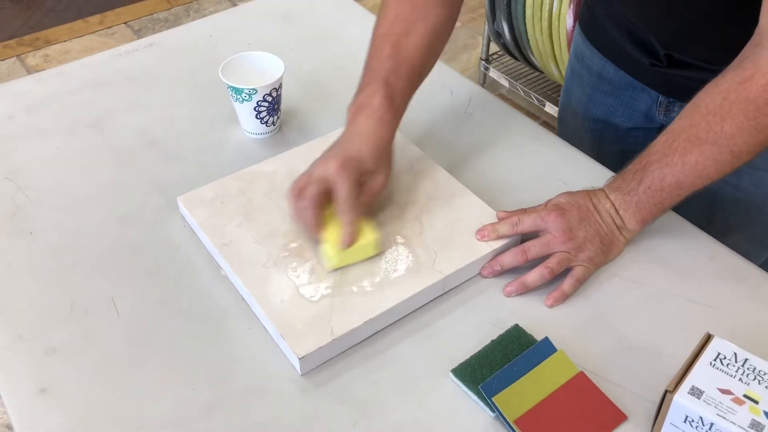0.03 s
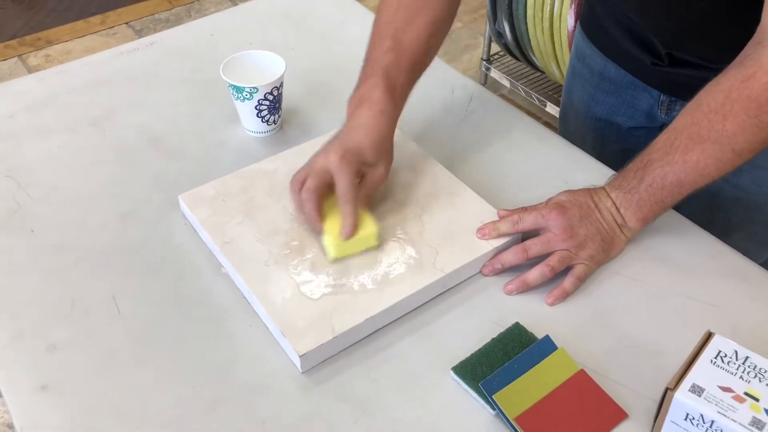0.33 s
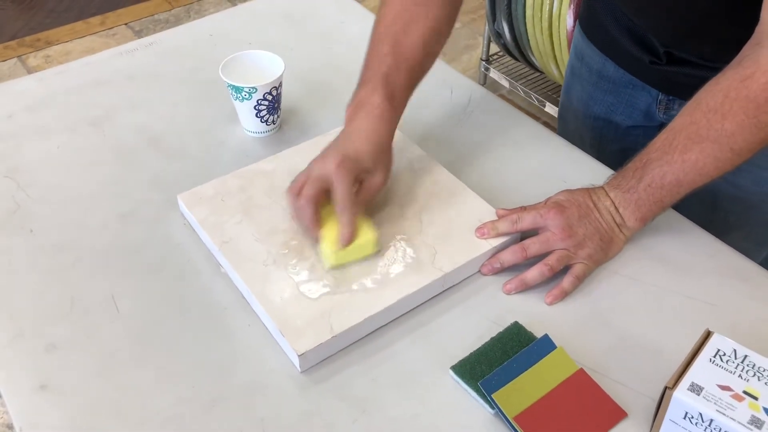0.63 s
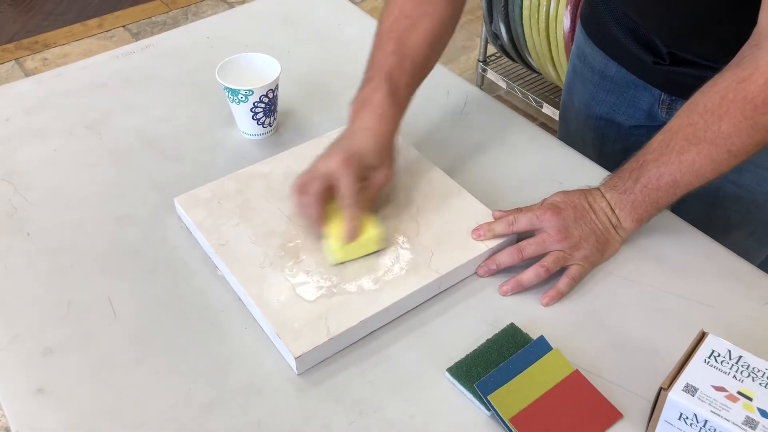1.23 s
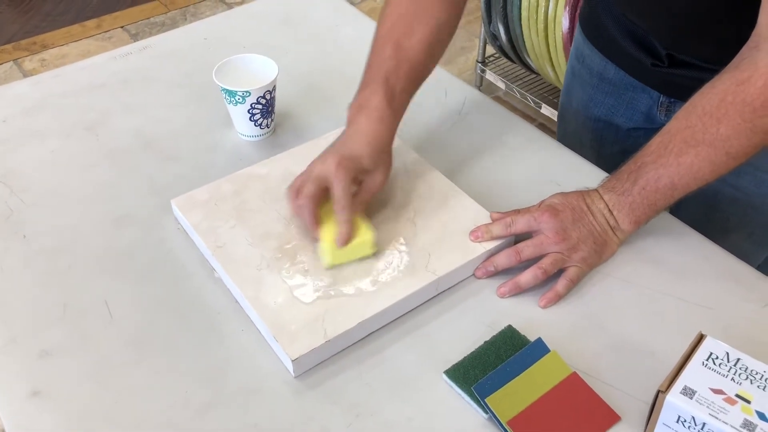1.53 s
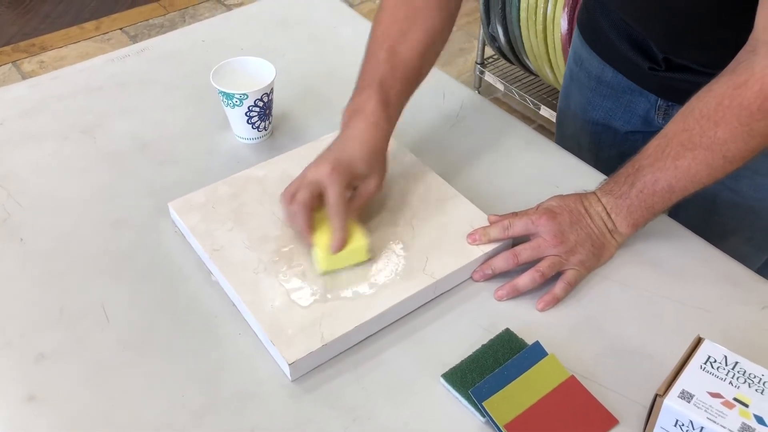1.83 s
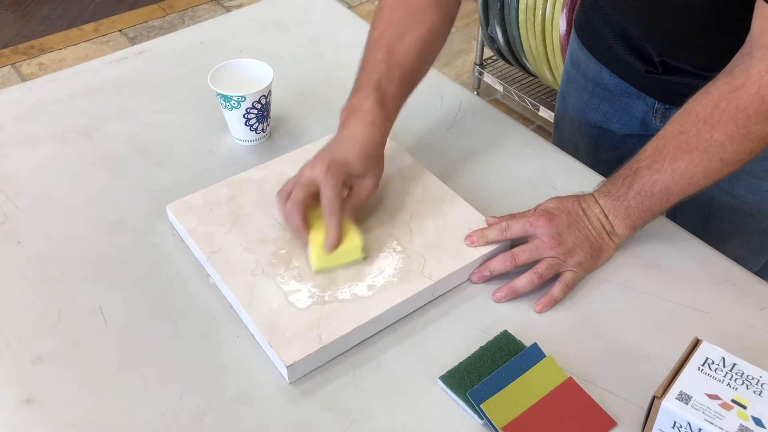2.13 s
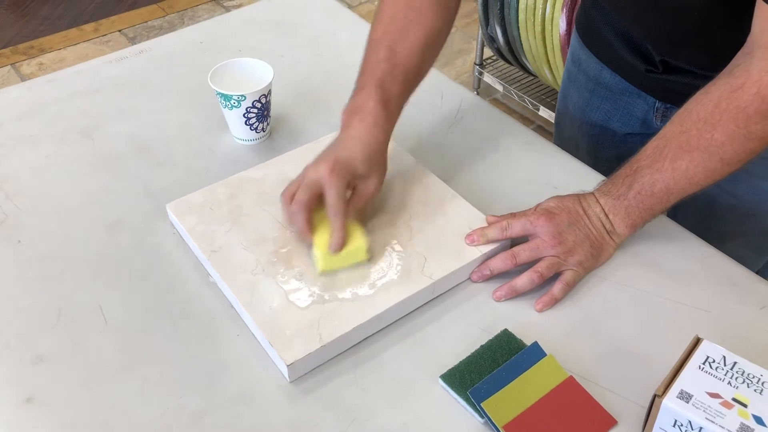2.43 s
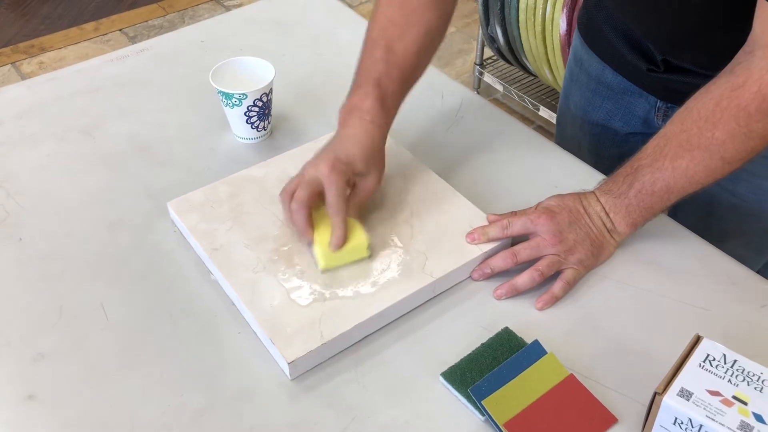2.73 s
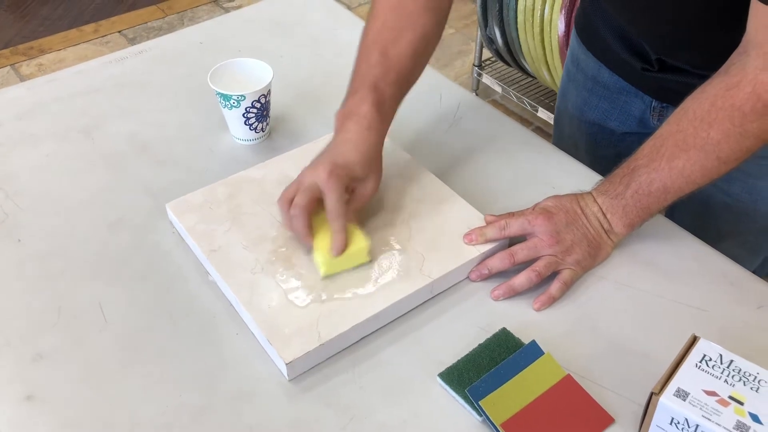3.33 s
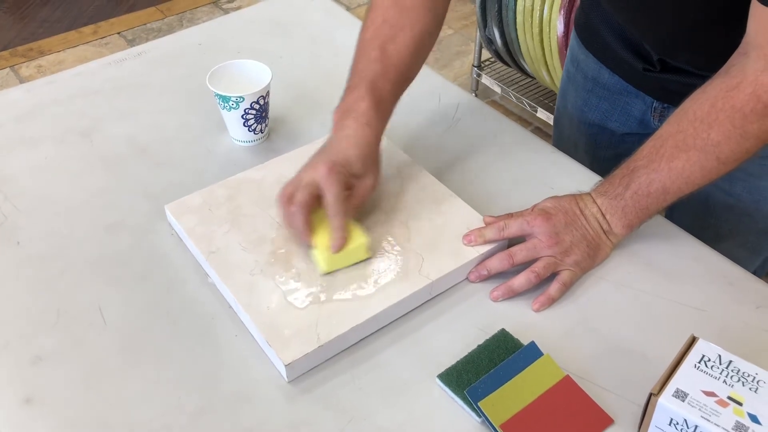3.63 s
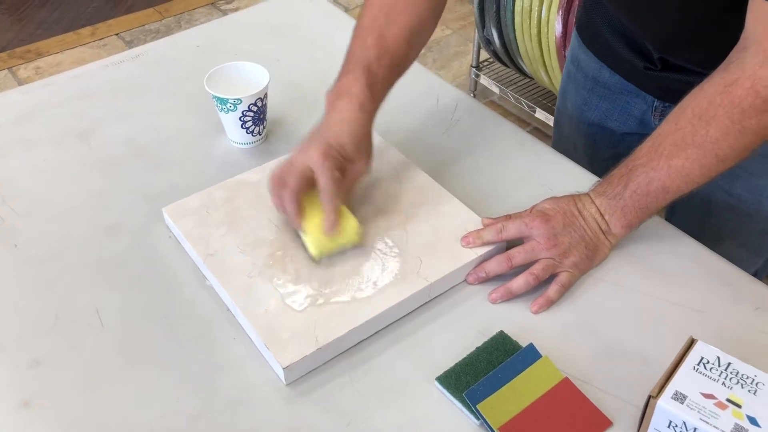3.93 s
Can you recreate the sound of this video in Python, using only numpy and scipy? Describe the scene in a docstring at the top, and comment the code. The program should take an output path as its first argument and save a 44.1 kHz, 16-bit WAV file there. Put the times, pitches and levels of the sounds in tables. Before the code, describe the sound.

Gritty, wet scrubbing of an abrasive pad circling steadily on a stone slab.

```python
"""Wet pad scrubbing stone

A wet abrasive pad circles on a stone slab on a table, about three small loops a second.
Grit catches the stone in a dense hiss; hollows under hand and pad colour each part of the loop.
Squeezed water squelches, the table rumbles under the strokes and a motor hums in the workshop."""
import sys
import numpy as np
from scipy import signal
from scipy.fft import rfft, irfft
from scipy.io import wavfile

SR = 44100
rng = np.random.default_rng(int(sys.argv[2]) if len(sys.argv) > 2 else 0)


def master_out(mix):
    """Clip the mix to full scale and print it as 16-bit PCM to the path in sys.argv[1]."""
    frames = np.transpose(np.atleast_2d(mix))
    ceiling = np.clip(frames, -1, 1)
    pcm = np.round(ceiling * 32767).astype(np.int16)
    wavfile.write(sys.argv[1], SR, pcm)


N = 176400
T = np.arange(N) / SR

# Hand loops (mid-push time [s], far-turn time [s], push strength [x], push pitch [Hz], hollow depth [x])
LOOPS = [(-.05, 0.03, 1, 4900, 1), (0.23, 0.325, 0.96, 5900, 1), (0.527, 0.618, 1, 5930, 0.84),
         (0.856, 0.94, 1.2, 5400, 1), (1.164, 1.25, 1, 5870, 1), (1.45, 1.525, 0.9, 5750, 1.06),
         (1.745, 1.83, 0.9, 5800, 0.65), (2.035, 2.13, .8, 5700, 1), (2.326, 2.417, 0.8, 5700, 0.9),
         (2.625, 2.705, .9, 5600, 1), (2.934, 3, 1, 5570, 1), (3.238, 3.32, 1.3, 5700, 1.06),
         (3.54, 3.637, 1.1, 5900, .9), (3.875, 3.94, .2, 5700, 0.75), (4.15, 4.23, 1, 5700, 0.6)]
# Grit spectrum (frequency [Hz], density [dB])
GRIT_SPECTRUM = [(300, -17), (750, -22), (930, -14.5), (1060, -12), (1280, -2.5), (1450, -10), (1650, -4),
                 (1900, -11.5), (2500, -4), (3000, -4.5), (3500, 0.5), (4100, -2.5), (4500, -9.5),
                 (4950, -4.5), (6000, -4.5), (6800, -1.5), (7500, -3), (8100, -7), (8900, -6), (10000, -8),
                 (11200, -8), (13000, -11), (15700, -15)]
# Scrubbing effort, used relative to its median (time [s], level [dB])
EFFORT = [(0.0, -36.5), (0.05, -42), (0.09, -38.5), (0.18, -41.5), (0.24, -36.5), (0.3, -40), (0.35, -39.5),
          (0.42, -40.5), (0.45, -39.5), (0.51, -41.0), (0.57, -36.5), (0.61, -40.5), (0.64, -47),
          (0.66, -41.5), (0.7, -39), (0.8, -43.5), (0.83, -38.5), (0.87, -37.5), (0.95, -44.5),
          (0.98, -39.5), (1.1, -42.0), (1.12, -43), (1.17, -37), (1.26, -42.0), (1.32, -39.5), (1.35, -41),
          (1.41, -41.0), (1.44, -38.5), (1.5, -38), (1.55, -41.0), (1.67, -41.5), (1.7, -43.5),
          (1.74, -38.5), (1.77, -38.0), (1.83, -43), (1.86, -39.5), (1.99, -42.0), (2.01, -39.5),
          (2.07, -37.5), (2.11, -41.5), (2.16, -38.0), (2.19, -41.5), (2.4, -37.5), (2.44, -42),
          (2.51, -40), (2.58, -42.0), (2.62, -38.5), (2.69, -41), (2.76, -39.5), (2.82, -42), (2.86, -40.5),
          (2.93, -40.5), (3.0, -39.0), (3.07, -43.5), (3.09, -40.5), (3.19, -41.5), (3.25, -37.5),
          (3.32, -42), (3.39, -39.0), (3.46, -46), (3.52, -38.5), (3.6, -42), (3.71, -42.0), (3.83, -42.5),
          (3.86, -40.5), (3.92, -43), (3.98, -49), (3.99, -65)]
# Hiss response to effort (frequency [Hz], slope [dB/dB])
EFFORT_SLOPE = [(500, 0.08), (1300, 0.054), (2500, 0.54), (3500, 0.65), (5500, 1.08), (9000, 1.36),
                (16000, 0.87)]
# Low-mid weight, used relative to its median (time [s], level [dB])
LOW_MID_LEVEL = [(0.0, -51), (0.24, -56), (0.33, -53), (0.49, -54.5), (0.6, -52), (0.85, -56),
                 (0.93, -52.5), (1.46, -51.5), (1.51, -50.5), (1.75, -52), (1.77, -50.5), (2.04, -51),
                 (2.12, -48.5), (2.15, -51.5), (3.16, -51), (3.24, -53.5), (3.32, -50), (3.35, -53.5),
                 (3.45, -48.5), (3.51, -54), (3.74, -49.5), (3.89, -57), (3.91, -56), (4.0, -61.5)]
# Hollows (centre [Hz], width [oct], gain [dB], place [loops], length [loops], glide [oct/loop])
HOLLOWS = [(1875, 0.17, 7, 0.18, 0.098, -0.022), (2730, .13, 3.5, 0.14, 0.056, -0.21),
           (3330, 0.027, 6, 0.63, 0.061, -0.48), (4240, 0.036, 8.5, 0.74, 0.057, 0.086),
           (1220, 0.11, 4, 0.69, 0.096, -0.93), (684, 0.23, 10, 0.56, 0.12, -0.64),
           (980, 0.059, 7.5, 0.78, 0.073, 0.08), (1260, 0.057, -10.5, 0.92, 0.068, 0.42),
           (3470, 0.19, -4, 1, 0.089, 0.06), (7000, 0.15, -4, 0.08, 0.065, 0)]
# Rasp of the forward push (width [oct], gain [dB], place [loops], length [loops], glide [oct/loop])
PUSH_RASP = (0.12, 4.65, 0.014, 0.15, 0.15)


def scrub(grains_per_s=11000, smooth_share=0.45, far_turn_loops=0.18):
    """Grit catches the stone; effort, hollows and water shape the hiss."""
    clicks = np.sqrt(1 - smooth_share) * grains(grains_per_s, spread_db=2)
    hiss = np.sqrt(smooth_share) * rng.standard_normal(N)
    hz, t, spectrum = signal.stft(clicks + hiss, SR, nperseg=512, noverlap=384)
    hz = hz[:, None]
    push_s, far_s, *per_loop = np.transpose(LOOPS)
    loop = np.arange(len(push_s))
    turn = np.interp(t, np.c_[push_s, far_s].ravel(), np.c_[loop, loop + far_turn_loops].ravel())
    push, push_hz, depth = (np.interp(t, push_s, column) for column in per_loop)
    effort_db, low_mid_db = at_time(EFFORT, t), at_time(LOW_MID_LEVEL, t)
    db = at_hz(GRIT_SPECTRUM, hz) + at_hz(EFFORT_SLOPE, hz) * (effort_db - np.median(effort_db))
    db += depth * sum(resonance(hz, turn, *row) for row in HOLLOWS)
    db += push * resonance(hz, turn, push_hz, *PUSH_RASP)
    low_mid_band = bell(np.log2((hz + 1) / 1220) / 0.85)
    db += 0.9 * (low_mid_db - np.median(low_mid_db)) * low_mid_band
    db += squelches(hz, t)
    db += flicker(hz, t)
    _, shaped = signal.istft(spectrum * amp(db), SR, nperseg=512, noverlap=384)
    return unit(shaped[:N])


def grains(per_s, spread_db):
    """Grit clicks of either sign, a few larger than the rest."""
    size = amp(spread_db * np.minimum(rng.exponential(1, N), 3.5))
    return unit(size * rng.choice([-1., 1.], N) * (rng.random(N) < per_s / SR))


def resonance(hz, turn, centre_hz, width_oct, gain_db, place, length, glide):
    """Gain in dB of a peak or notch that opens, glides and closes once a loop."""
    offset = (turn - place + .5) % 1 - .5
    detune_oct = np.log2((hz + 1) / centre_hz) - glide * offset
    return gain_db * bell(offset / length) * bell(detune_oct / width_oct)


def flicker(hz, t, patch_db=1.5, patch_hz=200, patch_s=0.021, jitter_db=0.15):
    """Gain in dB: the hiss flickers in small patches of time and frequency."""
    patches = rng.standard_normal((len(hz), len(t)))
    patches = blur(patches, .5 * patch_hz / hz[1, 0], axis=0)
    patches = blur(patches, .5 * patch_s / t[1], axis=1)
    return patch_db * unit(patches) + jitter_db * rng.standard_normal(len(t))


# Wet squelches (time [s], centre [Hz], gain [dB], length [s])
SQUELCHES = [(0.463, 3500, 4, 0.032), (1.36, 3500, 2, 0.016), (2.55, 3580, 6, .02), (2.81, 3400, -1, 0.013),
             (3.13, 3450, 5.5, 0.0072), (3.43, 3430, 7, 0.0068), (3.75, 3360, 8, .015)]


def squelches(hz, t, width_hz=140):
    """Gain in dB of brief narrow bands as the water film is squeezed out."""
    return sum(gain_db * bell((t - time_s) / length_s) * bell((hz - centre_hz) / width_hz)
               for time_s, centre_hz, gain_db, length_s in SQUELCHES)


# Table spectrum (frequency [Hz], density [dB])
RUMBLE_SPECTRUM = [(25, -33), (42, -13), (70, -2), (95, -0.5), (110, -1.5), (122, 8.5), (135, 0),
                   (160, 0.5), (200, -6), (240, -9.5), (280, -14), (380, -14.5), (500, -21), (800, -24),
                   (1500, -43)]
# Rumble envelope before trim (time [s], level [dB])
RUMBLE_LEVEL = [(0.0, -49.5), (0.24, -45.5), (0.29, -48.5), (0.46, -46), (0.57, -49), (0.67, -42.5),
                (0.76, -51), (0.82, -47), (0.9, -48), (1.0, -46.5), (1.07, -49), (1.5, -46.5),
                (1.67, -52.5), (1.74, -45.5), (1.82, -48.0), (1.93, -44), (1.98, -48.5), (2.08, -46),
                (2.22, -48.5), (2.46, -45), (2.5, -48.5), (2.73, -46.5), (2.85, -48), (2.99, -48.5),
                (3.14, -46), (3.2, -52), (3.25, -48), (3.53, -48.5), (3.58, -46.5), (3.75, -48),
                (3.84, -46.5), (3.99, -46.5)]


def table_rumble(trim_db=-1.5):
    """The dragging pad shakes slab and table."""
    return amp(trim_db + at_time(RUMBLE_LEVEL, T)) * coloured(RUMBLE_SPECTRUM)


# Deep hum envelope (time [s], level [dB])
HUM_LEVEL = [(0, -47), (.5, -47.5), (1.1, -48.5), (1.6, -48.5), (1.9, -48), (2.38, -48), (2.5, -46),
             (3.2, -46.5), (3.55, -44), (3.8, -45.5), (4, -44.5)]
# Upper hum lines (frequency [Hz], level [dB], waver [0-1])
HUM_LINES = [(120.3, -61.5, 0.5), (232.4, -65.5, 0.3)]


def motor():
    """A motor hums deeply, with two weaker lines above."""
    deep = amp(at_time(HUM_LEVEL, T)) * hum_line(hz=58.84, waver=0.11)
    return deep + sum(amp(db) * hum_line(hz, waver) for hz, db, waver in HUM_LINES)


def hum_line(hz, waver, waver_s=0.076):
    """A tone near rms 1, wavering in level and pitch."""
    real, imag = (unit(blur(noise, waver_s * SR, axis=0)) for noise in rng.standard_normal((2, N)))
    carrier = np.exp(2j * np.pi * (hz * T + rng.random()))
    return ((np.sqrt(2) + waver * (real + 1j * imag)) * carrier).real


# Workshop air (frequency [Hz], density [dB])
AIR_SPECTRUM = [(20, -11), (40, -3), (60, -11), (200, -8.5), (500, -10), (1000, -23.5), (4000, -11.5),
                (16000, -41)]


def air(level_db=-61):
    """Steady background noise of the workshop."""
    return amp(level_db) * coloured(AIR_SPECTRUM)


def room(x, t60_s=0.26, tail_db=-14, predelay_s=.004):
    """Direct sound plus the workshop's short tail."""
    t = T[:SR // 2]
    tail = rng.standard_normal(len(t)) * (t > predelay_s) * amp(-60 * t / t60_s)
    return x + amp(tail_db) * signal.fftconvolve(x, tail / np.linalg.norm(tail))[:N]


def amp(db):
    """Decibels to gain."""
    return 10 ** (np.asarray(db) / 20)


def unit(x):
    """Scales to rms 1."""
    return x / np.sqrt(np.mean(x ** 2) + 1e-20)


def bell(x):
    """Gaussian, height 1, sigma 1."""
    return np.exp(-.5 * x ** 2)


def at_hz(points, hz):
    """Reads a curve in log frequency."""
    knots_hz, values = np.transpose(points)
    return np.interp(np.log(hz + 1), np.log(knots_hz), values)


def at_time(points, t):
    """Reads a curve in time."""
    return np.interp(t, *np.transpose(points))


def coloured(spectrum):
    """Steady shaped noise, rms 1."""
    gain = amp(at_hz(spectrum, np.fft.rfftfreq(N, 1 / SR)))
    return unit(irfft(rfft(rng.standard_normal(N)) * gain, N))


def blur(x, sigma_steps, axis):
    """Gaussian smoothing along one axis."""
    n = x.shape[axis]
    kernel = np.exp(-2 * (np.pi * np.fft.rfftfreq(n) * sigma_steps) ** 2)
    return np.moveaxis(irfft(rfft(np.moveaxis(x, axis, -1)) * kernel, n), -1, axis)


def scene(scrub_db=-38.5):
    """Scrubbing, table, motor and air, alike in both channels."""
    mix = amp(scrub_db) * unit(room(scrub())) + table_rumble() + motor() + air()
    return np.array([mix, mix])


def record(dry, cutoff_hz=15800):
    """Steep low-pass."""
    lowpass = signal.firwin(801, cutoff_hz, window=("kaiser", 9), fs=SR)
    return signal.oaconvolve(dry, lowpass[None], "same")


dry = scene()
out = record(dry)
master_out(out)
```